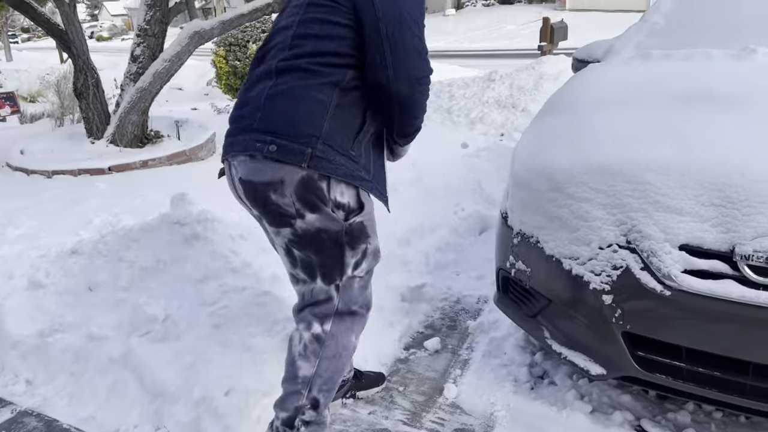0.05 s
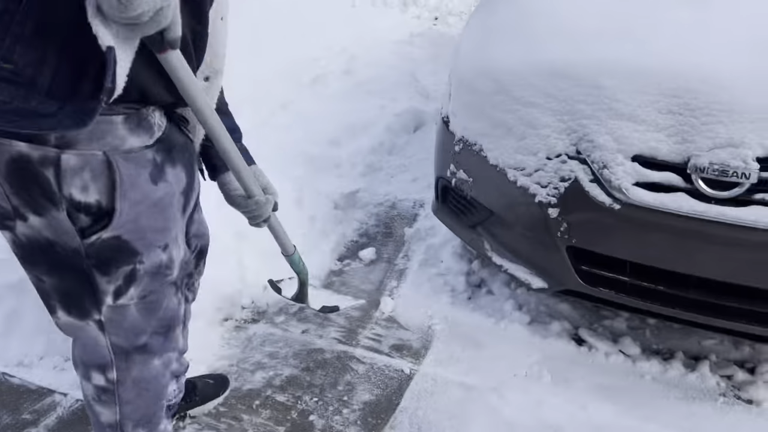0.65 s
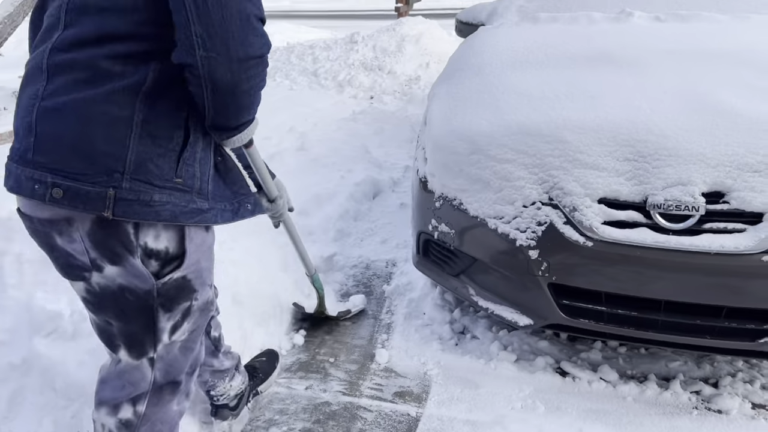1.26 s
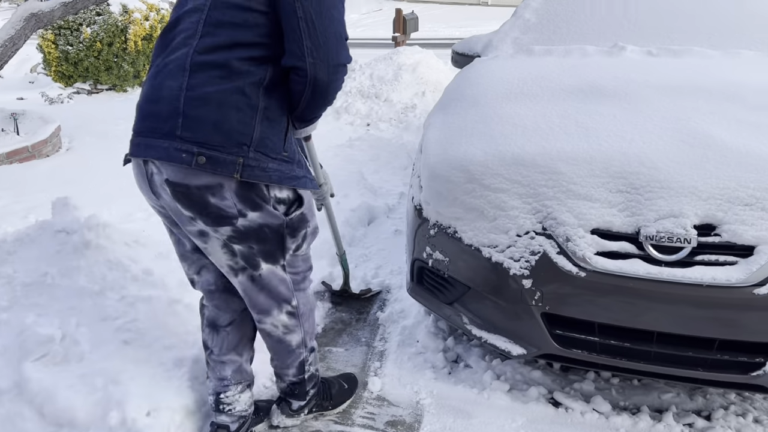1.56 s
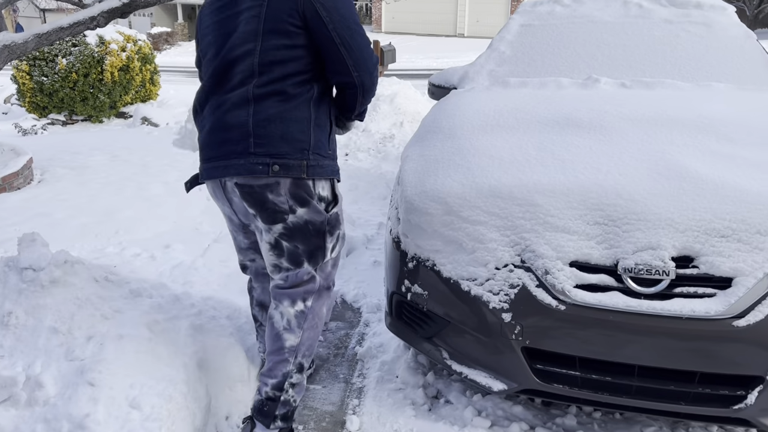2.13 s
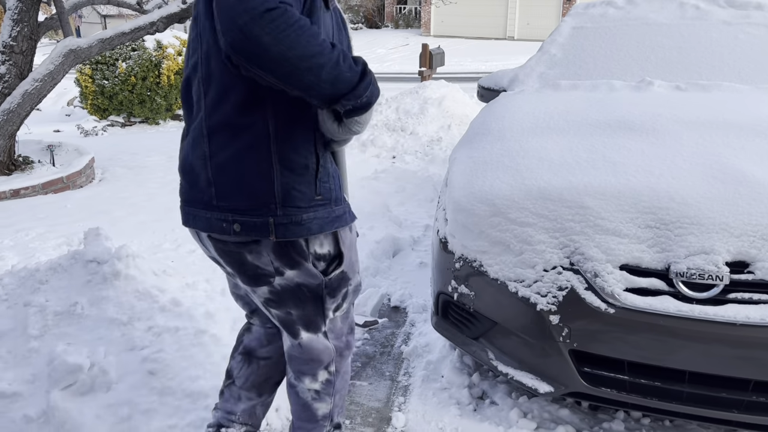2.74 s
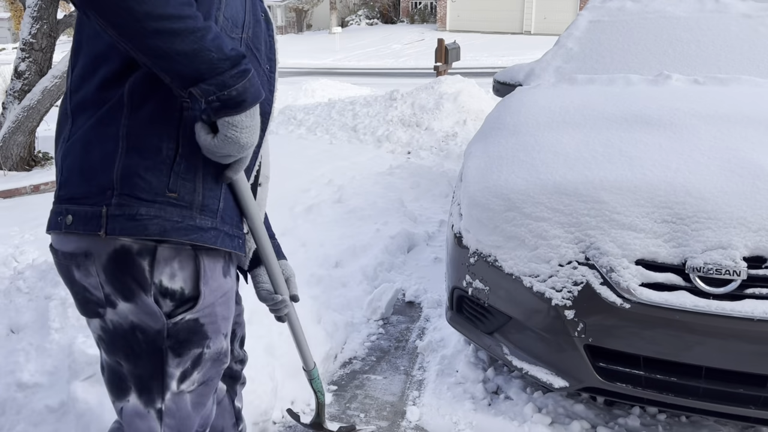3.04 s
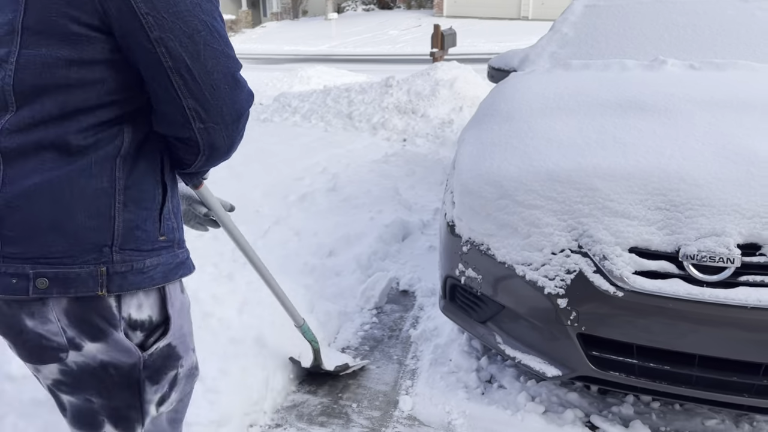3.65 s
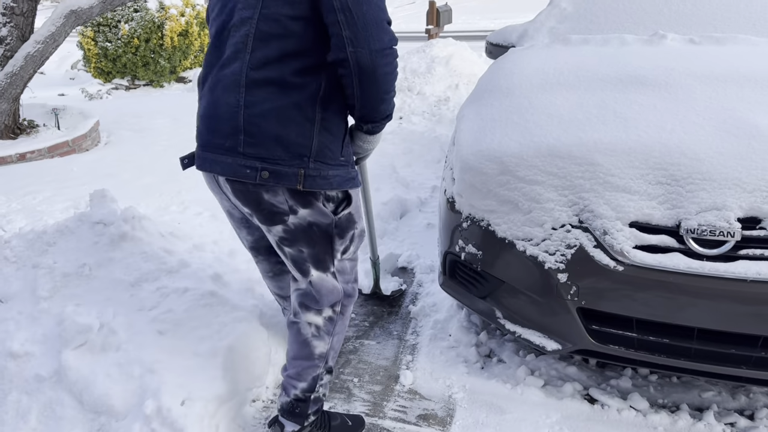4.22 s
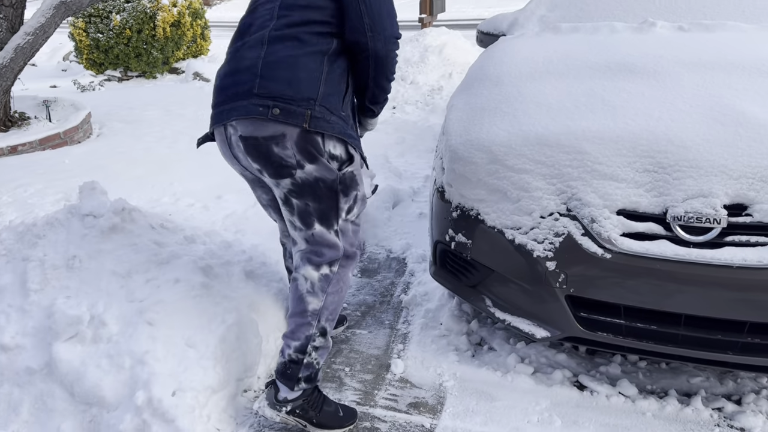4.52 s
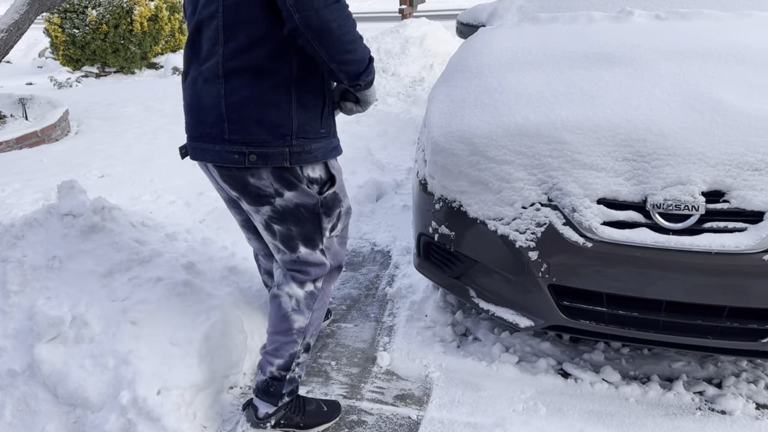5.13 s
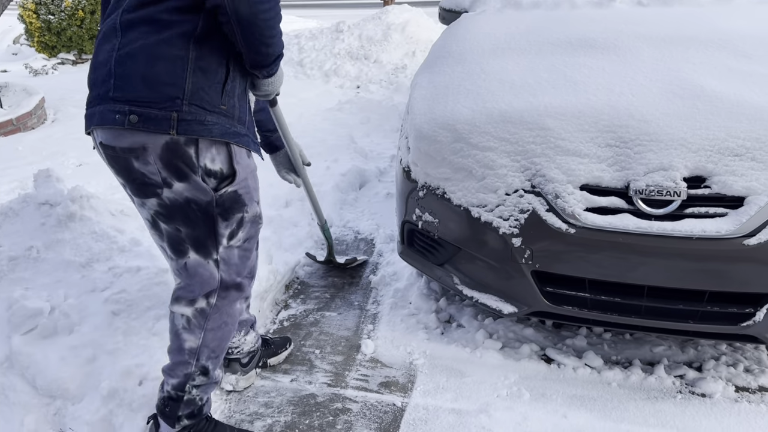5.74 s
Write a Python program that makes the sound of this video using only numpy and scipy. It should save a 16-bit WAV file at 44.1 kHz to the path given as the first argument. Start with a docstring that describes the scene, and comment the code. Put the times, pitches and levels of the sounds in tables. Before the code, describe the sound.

Heard from a few steps away in a snowy yard, a shovel digs loudly into packed snow and grates along concrete. It eases off briefly, leaving soft sweeps and the thuds of boots and clumps, then returns with choppy scrapes and finally quick, hissing scoops. Blade knocks and small ice cracks punctuate the strokes, while far-off traffic rumbles faintly.

```python
"""A snow shovel scrapes a concrete walkway, a few steps away, beside a parked car. Stick-slip friction on
grit drives the blade's resonances into a rasp while crushed ice crystals hiss. A hard bite and long, flat
pushes give way to short, bright scoops. Impacts ring the blade, ice cracks, and boots and clumps thud
into snow, over a low rumble of distant traffic."""
import sys
import numpy as np
from scipy import signal
from scipy.fft import rfft, irfft
from scipy.io import wavfile
from scipy.ndimage import uniform_filter1d

SR = 44100
rng = np.random.default_rng(int(sys.argv[2]) if len(sys.argv) > 2 else 0)


def waveform_to_disk(signal):
    """Save audio, clipped to [-1, 1], as 16-bit WAV at the path in sys.argv[1]."""
    frames = np.transpose(np.atleast_2d(signal))
    scaled = np.clip(frames, -1, 1) * 32767
    samples = np.round(scaled).astype(np.int16)
    wavfile.write(sys.argv[1], SR, samples)


N = 254898
FFT_SIZE = 4096
FREQS = np.arange(FFT_SIZE // 2 + 1) * SR / FFT_SIZE
SIDES = np.array([[1], [-1]])  # left, right
SPLIT_HZ = 5890  # the blade's body sounds below, hiss and edge crack above


def undb(db):
    """Decibels to amplitude ratio."""
    return 10 ** (np.asarray(db) / 20)


def level(x):
    """Scale a stereo pair so that its centre has rms 1."""
    return x / np.sqrt(np.mean(x.mean(axis=0) ** 2) + 1e-18)


def curve(points, column=1):
    """Interpolate one column of a table over log frequency."""
    table = np.array(points)
    return np.interp(np.log(FREQS + 1), np.log(table[:, 0]), table[:, column])


def response(db):
    """Minimum-phase impulse response with the given gain curve."""
    cepstrum = irfft(np.log(undb(db)))
    cepstrum[1:len(FREQS) - 1] *= 2
    cepstrum[len(FREQS):] = 0
    return irfft(np.exp(rfft(cepstrum)))


def resonance(hz, width_hz):
    """Lorentzian peak of unit height, at least 60 Hz wide."""
    return 1 / (1 + (2 * (FREQS - hz) / max(width_hz, 60)) ** 2)


def through(x, ir):
    """Convolution, keeping the length."""
    return signal.fftconvolve(np.atleast_2d(x), np.atleast_2d(ir), axes=1)[:, :x.shape[-1]]


def cut(x, hz, kind, order=4):
    """Butterworth filter."""
    return signal.sosfilt(signal.butter(order, hz, kind, fs=SR, output="sos"), x)


def wander(n, rate_hz):
    """Smooth random modulation of roughly unit size."""
    hold = max(int(SR / rate_hz), 2)
    steps = np.repeat(rng.standard_normal(n // hold + 1), hold)
    return 0.82 * uniform_filter1d(steps, hold)[:n]


def fade(n, t60):
    """Exponential decay, 60 dB in t60 seconds."""
    return np.exp(-np.log(1000) * np.arange(n) / SR / max(t60, 1e-3))


def add(out, start, x):
    """Superpose a sound at its start time."""
    i = max(int(start * SR), 0)
    out[:, i:i + x.shape[1]] += x[:, :N - i]


def grit(n, per_s, spread_db):
    """Tiny fractures form a Poisson process: many faint, a few strong."""
    size = undb(spread_db * np.minimum(rng.exponential(size=n), 6))
    return rng.standard_normal(n) * size * (rng.random(n) < per_s / SR)


# Spectrum of the traffic wash. Each row: frequency in Hz, gain in dB.
TRAFFIC_COLOUR = [(30, -41), (77, -15), (124, -6), (233, -6), (319, -18), (480, -12.5), (800, -18),
                  (1100, -23.5), (1500, -22.5), (2300, -26.5), (2900, -27), (4400, -35), (10800, -38),
                  (16000, -35.5)]


def traffic(wash_db=-56, rumble_db=-56.5, rumble_hz=126):
    """Coherence falls with frequency: distant traffic is a centred rumble under a wider wash."""
    mid, side, low_mid, low_side = rng.standard_normal((4, N))
    colour = curve(TRAFFIC_COLOUR)
    width_db = 20 * np.log10(np.clip(FREQS / 2500, .2, .85))
    wash = through(mid, response(colour)) + SIDES * through(side, response(colour + width_db))
    wash = level(wash) * undb(wash_db + 2.8 * wander(N, 3.56))
    band_hz = rumble_hz * 2 ** np.array([-0.27, 0.27])
    rumble = cut(low_mid + 0.058 * SIDES * low_side, band_hz, "band", order=2)
    return wash + level(rumble) * undb(rumble_db + 0.3 * wander(N, 3.96))


def crumbs(db=-73, low_hz=1500):
    """Shot noise: loose crystals trickle in faint, independent ticks."""
    ticks = np.array([grit(N, per_s=200, spread_db=4.5) for _ in range(2)])
    ticks *= undb(3.5 * wander(N, 27.1))
    return level(cut(ticks, low_hz, "high", order=1)) * undb(db)


# Blade modes. Each row: frequency in Hz, width in Hz, gain in dB when pushed, scooping and struck.
BLADE_MODES = [(533, 24, 7.5, -6.5, 14), (681, 27, 3.5, 3, 12), (839, 85, 8.5, -14, 15),
               (1130, 49, -1, 10.5, 12), (1300, 23, 10, 10, -1), (1325, 160, -1, -4.5, 7.5),
               (1637, 160, 5, 3.5, 7), (2140, 37, 3, -4.5, 8), (2328, 144, 6.5, -9, 7.5),
               (2970, 155, 4.5, -8, 4), (1900, 110, 1.5, -0.5, 6.5), (2880, 100, 0.5, -3, 10.5),
               (3070, 59, 0, 3, 5), (3300, 165, 5.5, -0.5, 7), (3720, 760, 4.5, 1.5, 6),
               (5100, 96, -2, 2, -2.5)]
PUSHED, SCOOPING, STRUCK = 2, 3, 4  # gain columns


def blade(colour, column, extra_db=0):
    """Damped resonance: snow on the blade keeps its modes short; each shifts the colour up to 12 dB."""
    modes_db = sum(np.clip(mode[column], -12, 12) * resonance(*mode[:2]) for mode in BLADE_MODES)
    return response(curve(colour) + modes_db + extra_db)


# Stereo placement of pushes and scoops at two microphone ports. Each row: frequency in Hz,
# phase lead of the left in radians, left minus right in dB, direct share of the power from 0 to 1.
PUSH_PATHS = [(200, 0.05, -3.5, 0.9), (1450, 1.26, 3, 0.3), (3760, 0.14, -0.5, 0.4),
              (5400, 11.5, -1.5, 0.04), (7030, 2.2, 4, 0.2), (9600, 0.98, 7.5, 0.53), (13400, 2.4, 4.5, 0),
              (17200, 3.7, 3, 0.98)]
SCOOP_PATHS = [(200, 1.5, -5, 1), (1040, -1.7, 0, 0.34), (2570, -3.5, -0.5, 0.46), (4200, -2, -4, 0.54),
               (6500, -3, -2, 0.47), (10160, 12, 7, 0.074), (11870, 0.5, 5, 0.33), (16000, -2, -3, 0.29)]


def propagation(paths, scatter_t60=0.033):
    """Interference: the direct wave meets random scatter from car and ground at each port."""
    lead, balance_db, share = (curve(paths, column) for column in (1, 2, 3))
    # long waves diffract round small obstacles, so the lows arrive mostly direct
    share = np.clip(share, .92 / (1 + (FREQS / 4000) ** 2), .99)
    scatter = rng.standard_normal((2, FFT_SIZE)) * fade(FFT_SIZE, scatter_t60)
    scatter = rfft(scatter / np.linalg.norm(scatter, axis=1, keepdims=True))
    pair = np.sqrt(share) * np.exp(.5j * SIDES * lead) + np.sqrt(1 - share) * scatter
    centre = np.sqrt(share * np.cos(lead / 2) ** 2 + (1 - share) / 2)
    return np.roll(irfft(pair * undb(SIDES * balance_db / 2) / centre), 24, axis=1)


def travel(x, paths, patch_s=.048):
    """A moving source scatters differently from each patch of ground."""
    step = int(patch_s * SR)
    out = np.zeros((2, len(x) + FFT_SIZE))
    for i in range(0, len(x), step):
        piece = signal.fftconvolve(x[None, i:i + step], propagation(paths), axes=1)
        out[:, i:i + piece.shape[1]] += piece
    return out[:, :len(x)]


def effort(n, lift_s, swell_db, attack_s, release_db_per_s):
    """Envelope of a stroke: contact, a steady change in dB up to the lift, then exponential decay."""
    t = np.arange(n) / SR
    db = swell_db * np.minimum(t / lift_s - 1, 0) - release_db_per_s * np.maximum(t - lift_s, 0)
    return undb(db) * np.minimum(t / attack_s, 1)


def scrape(strokes, body, paths, per_s, spread_db, chatter_db, judder_db, attack_s, release_db_per_s):
    """Stick-slip friction: each slip of the edge over grit shakes the blade and crushes crystals."""
    out, n = np.zeros((2, N)), int(.38 * SR)
    for start, lift_s, db, swell_db, hiss_db in strokes:
        slips = grit(n, per_s, spread_db)
        slips *= undb(chatter_db * wander(n, 220.7) + judder_db * wander(n, 70.6))
        # the arms keep the push steady, however unevenly the edge slips
        slips /= np.sqrt(uniform_filter1d(slips ** 2, size=SR // 25) + 1e-9)
        sound = through(travel(slips, paths), body)
        rasp = level(cut(sound, SPLIT_HZ, "low"))
        hiss = level(cut(sound, SPLIT_HZ, "high")) * undb(hiss_db)
        force = effort(n, lift_s, swell_db, attack_s, release_db_per_s)
        add(out, start, (rasp + hiss) * undb(db) * force)
    return out


# Scooping strokes. Each row: start in seconds, time to the lift in seconds, rasp at the lift in dB,
# swell up to the lift in dB, hiss relative to the rasp in dB.
SCOOP_STROKES = [(0.004, 0.021, -52, 0, -6.5), (0.064, 0.0064, -55, 0, 1), (0.112, 0.13, -38.5, 15.5, -3.5),
                 (0.621, 0.02, -42, -3.5, 2.5), (4.563, 0.23, -32.5, 18, 7.5), (4.946, 0.0083, -40, 3, -1),
                 (5.015, 0.21, -42.5, 18, 8.5), (5.233, 0.041, -31.5, 12.5, 5),
                 (5.332, 0.029, -43.5, 13, -4), (5.473, 0.042, -39.5, 10.5, 2), (5.54, 0.102, -35.5, 12, 2),
                 (5.656, 0.093, -32, 2, 4)]
# Spectrum of light contact. Each row: frequency in Hz, gain in dB.
SCOOP_SPECTRUM = [(120, -55), (200, -18.5), (353, -13.5), (409, -35), (509, 2.5), (683, -6), (763, 4.5),
                  (1140, -7), (2170, -7), (3760, -5), (6170, -10), (6760, -14), (7830, -4), (12800, 0.5),
                  (16000, -7)]


def scoops():
    """Friction under light contact: dense, even slips make a bright rasp that stops quickly."""
    return scrape(SCOOP_STROKES, blade(SCOOP_SPECTRUM, SCOOPING), SCOOP_PATHS, per_s=10000, spread_db=1,
                  chatter_db=1.5, judder_db=2, attack_s=0.0035, release_db_per_s=580)


# Blows of the edge. Each row: time in seconds, ring in dB, crack in dB, most excited frequency in Hz.
BLOWS = [(0.101, -36.5, -46, 2160), (0.624, -54, -49, 1470), (0.768, -31, -44, 550),
         (1.238, -41, -43.5, 1530), (1.314, -35, -41, 2650), (1.386, -36.5, -30, 2530),
         (1.489, -40.5, -40, 2400), (3.027, -40.5, -42.5, 3170), (3.477, -40.5, -65, 3060),
         (3.583, -36.5, -38.5, 3000), (3.762, -45.5, -40.5, 2260), (3.887, -36, -36, 1650),
         (3.978, -49, -41, 2930), (4.308, -58, -47, 2380), (4.365, -46, -41.5, 1610),
         (4.414, -36.5, -46, 3000), (4.788, -30, -31, 1900), (4.794, -32, -54, 1990),
         (4.951, -42, -56, 1110), (5.242, -39.5, -30.5, 4050), (5.462, -29.5, -46.5, 590),
         (5.667, -40, -37, 680)]
# Spectrum of a blow. Each row: frequency in Hz, gain in dB.
BLOW_SPECTRUM = [(120, -31), (200, -22), (538, 1), (1680, 3.5), (2020, 9), (2610, 1), (5520, 1.5),
                 (6050, -3), (8120, -0.5), (11300, 5), (13100, 2), (16000, 0.5)]


def knocks(rattle_t60=0.063, focus_db=6, focus_octaves=0.23, scoop_image_s=4.53):
    """Impact excitation: a blow on concrete and its rattle ring the blade, with a shorter, high crack."""
    out, n = np.zeros((2, N)), SR // 6
    window_gain = np.sqrt(.02 * SR / n)  # levels hold for the energy packed into 20 ms
    for start, ring_db, crack_db, hz in BLOWS:
        # the point of impact favours some of the blade's modes
        emphasis_db = focus_db / (1 + (np.log2((FREQS + 1) / hz) / focus_octaves) ** 2)
        body = blade(BLOW_SPECTRUM, STRUCK, emphasis_db)
        # later blows sound with the scoops' stereo placement
        path = through(propagation(SCOOP_PATHS if start > scoop_image_s else PUSH_PATHS), body)
        contacts = grit(n, per_s=12000, spread_db=1.5)
        contacts[0] = 4  # the blow itself
        ring = level(cut(through(contacts * fade(n, rattle_t60), path), SPLIT_HZ, "low"))
        crack = level(cut(through(contacts * fade(n, rattle_t60 * 0.13), path), SPLIT_HZ, "high"))
        add(out, start, window_gain * (ring * undb(ring_db) + crack * undb(crack_db)))
    return out


# Landings in snow. Each row: time in seconds, onset level in dB, centre in Hz, 60 dB decay time
# in seconds, fall-off to either side in dB per octave.
LANDINGS = [(0.325, -38, 620, 0.076, 14.5), (0.391, -47.5, 513, .088, 14), (0.46, -42, 656, 0.11, 10.5),
            (0.768, -25, 580, 0.09, 14), (2.156, -46.5, 580, .062, 7), (2.276, -39, 910, 0.059, 19.5),
            (2.744, -48, 524, 0.24, 7), (2.919, -46, 885, 0.13, 10), (3.256, -40.5, 570, 0.12, 16),
            (3.388, -41.5, 610, 0.15, 11), (3.534, -37, 292, 0.021, 6), (3.825, -50.5, 287, .1, 23),
            (4.031, -43, 740, 0.062, 8), (4.89, -47.5, 685, .06, 7.5), (5.462, -30, 676, 0.06, 13)]


def thuds(give_s=0.0013):
    """Inelastic impact: snow packs under a boot, clump or blade in a dull burst of crunching grains."""
    out, n = np.zeros((2, N)), SR // 5
    for start, db, hz, t60, slope_db in LANDINGS:
        colour = response(-slope_db * np.hypot(np.log2((FREQS + 20) / hz), 0.04))
        press = fade(n, t60) * (1 - fade(n, give_s))
        grains = grit(n, per_s=9000, spread_db=3.6) * press
        crunch = through(through(grains, colour), propagation(PUSH_PATHS))
        add(out, start, crunch / crunch[:, :SR // 60].std() * undb(db))
    return out


# Sweeps over soft snow. Each row: start in seconds, length in seconds, final level in dB, swell in dB.
SWEEPS = [(0.349, 0.76, -59.5, -2), (1.88, 0.41, -60, -4.5), (2.579, 0.4, -55, 3)]
# Modes of the lightly touched blade. Each row: frequency in Hz, width in Hz, gain in dB.
SWEEP_MODES = [(767, 190, 5.5), (1060, 82, 1.5), (2306, 94, -1.5)]


def brush(powder_db=-19, powder_hz=2500):
    """Weak forcing: soft snow barely excites the blade, a hollow ring over the rustle of powder."""
    modes = sum(undb(db) * resonance(hz, width) for hz, width, db in SWEEP_MODES)
    powder = undb(powder_db) / np.hypot(1, FREQS / powder_hz)
    body = response(20 * np.log10(modes + powder))
    out, n = np.zeros((2, N)), int(.7 * SR)
    for start, length, db, swell_db in SWEEPS:
        force = effort(n, length, swell_db, attack_s=.04, release_db_per_s=150)
        ring = through(travel(grit(n, per_s=3000, spread_db=2.1), PUSH_PATHS), body)
        add(out, start, level(ring) * force * undb(db))
    return out


# Grit catching and ice breaking. Each row: time in seconds, onset level in dB.
FRACTURES = [(0.408, -43.5), (1.3862, -29), (1.9068, -38.5), (2.1058, -43), (2.219, -47), (2.584, -43),
             (2.746, -41), (3.234, -39.5), (3.7627, -39.5), (3.8457, -37), (3.9797, -38), (4.0038, -33),
             (4.032, -49), (4.0696, -38), (4.3105, -47), (5.3296, -35)]


def cracks(t60=0.034, low_hz=1800):
    """Brittle fracture: a stone or a piece of crust gives way at once, with a spray of splinters."""
    out, n = np.zeros((2, N)), SR // 12
    for start, db in FRACTURES:
        splinters = grit(n, per_s=8000, spread_db=1.9) * fade(n, t60)
        splinters[0] = 6  # the first snap
        tick = through(cut(splinters, low_hz, "high", order=1), propagation(PUSH_PATHS))
        add(out, start, tick / tick[:, :SR // 200].std() * undb(db))
    return out


# The cut into packed snow, with the columns of SCOOP_STROKES.
BITE_STROKES = [(0.775, 0.16, -26, 12.5, -4.5)]
# Spectrum of hard contact. Each row: frequency in Hz, gain in dB.
BITE_SPECTRUM = [(120, -65), (200, -30), (409, -23), (538, -11), (579, -18), (763, -19.5), (968, -28),
                 (1270, -13.5), (1450, -20.5), (1680, -16.5), (2700, -20), (3070, -17), (4430, -23.5),
                 (10900, -25), (16000, -22.5)]


def bite():
    """Friction under heavy load: the edge judders into packed snow with a swelling rasp."""
    return scrape(BITE_STROKES, blade(BITE_SPECTRUM, PUSHED), PUSH_PATHS, per_s=7900, spread_db=1.5,
                  chatter_db=-0.5, judder_db=2.8, attack_s=0.014, release_db_per_s=220)


# Bumps of the loaded shovel and boots. Each row: time in seconds, onset level in dB.
LOAD_SHIFTS = [(0.812, -36), (0.876, -35.5), (0.969, -43), (1.047, -48.5), (3.536, -59)]


def thumps(band_hz=(95, 190), t60=0.082):
    """Soft contact excites only low frequencies: the shifting load makes dull bumps."""
    out, n = np.zeros((2, N)), SR // 4
    for start, db in LOAD_SHIFTS:
        bump = cut(rng.standard_normal(n) * fade(n, t60), band_hz, "band", order=3)
        add(out, start, bump[None] / bump[:SR // 30].std() * undb(db))
    return out


# Strokes along the concrete, with the columns of SCOOP_STROKES.
PUSH_STROKES = [(1.195, 0.031, -46.5, 10.5, -6), (1.232, 0.11, -36, 6.5, -3), (1.345, 0.22, -41, 0, -3.5),
                (1.578, 0.14, -41.5, 0.5, 0), (1.808, 0.019, -43, 3.5, 0.5), (1.88, 0.14, -60.5, -6.5, -6),
                (3.019, 0.068, -45.5, -6.5, -9), (3.203, 0.052, -49.5, 2, -8),
                (3.281, 0.015, -44.5, 0, 2.5), (3.31, 0.04, -54, -0.5, -6), (3.352, 0.044, -42.5, -0.5, -4),
                (3.42, 0.064, -39.5, 9.5, -7), (3.505, 0.065, -40, 0.5, -3.5), (3.595, 0.058, -53.5, 0, 4),
                (3.65, 0.062, -45.5, 3, 5), (3.758, 0.096, -36.5, 5, 1), (3.885, 0.16, -47.5, 1, 1),
                (4.265, 0.165, -38, 19.5, 2), (4.44, 0.039, -50.5, -5, 6.5)]
# Spectrum of flat contact. Each row: frequency in Hz, gain in dB.
PUSH_SPECTRUM = [(120, -46), (200, 3.5), (350, -7.5), (540, 3.5), (860, 2), (1000, -6), (1400, 2.5),
                 (2200, 2), (3400, 1), (4800, -4), (5900, -8), (8000, -11.5), (12400, -5), (16000, -12)]


def pushes():
    """Sliding friction: the flat blade chatters over grit in sparser, more uneven slips."""
    return scrape(PUSH_STROKES, blade(PUSH_SPECTRUM, PUSHED), PUSH_PATHS, per_s=6500, spread_db=2,
                  chatter_db=1.5, judder_db=2.5, attack_s=0.0071, release_db_per_s=320)


def yard(x, wet_db=-30, t60=0.44, dull_hz=2500):
    """Reflection and absorption: house fronts return a faint echo, dulled by the snow."""
    n = SR // 2
    tail = cut(rng.standard_normal((2, n)) * fade(n, t60), dull_hz, "low", order=1)
    return x + undb(wet_db) * through(x, tail / np.linalg.norm(tail, axis=1, keepdims=True))


def scene():
    """Superposition: the shovelling and its echo add to trickling crystals and traffic."""
    shovelling = bite() + pushes() + scoops() + knocks() + thuds() + thumps() + cracks() + brush()
    return yard(shovelling) + crumbs() + traffic()


def record(dry):
    """Band limiting: a steep low-pass removes the treble above 15.8 kHz."""
    return signal.sosfilt(signal.ellip(10, .2, 70, 15800, fs=SR, output="sos"), dry)


dry = scene()
out = record(dry)
waveform_to_disk(out)
```